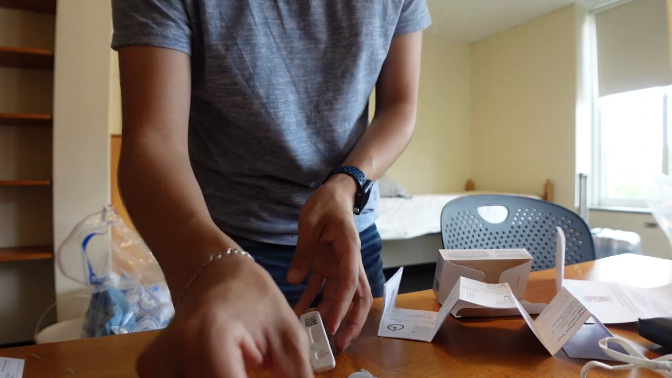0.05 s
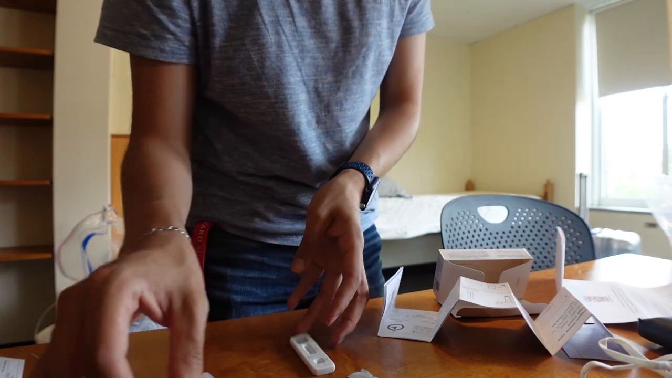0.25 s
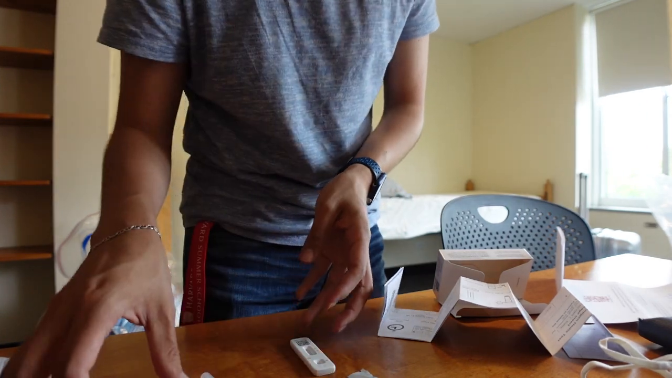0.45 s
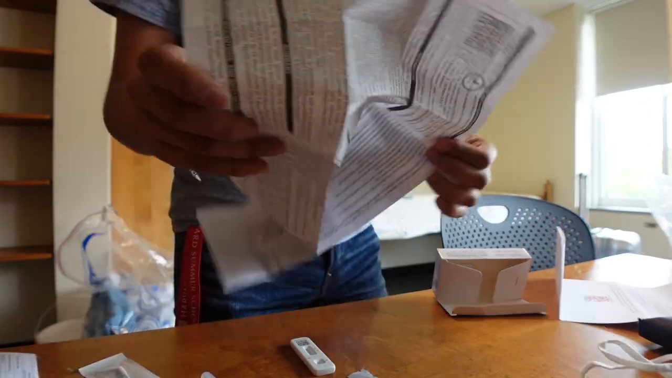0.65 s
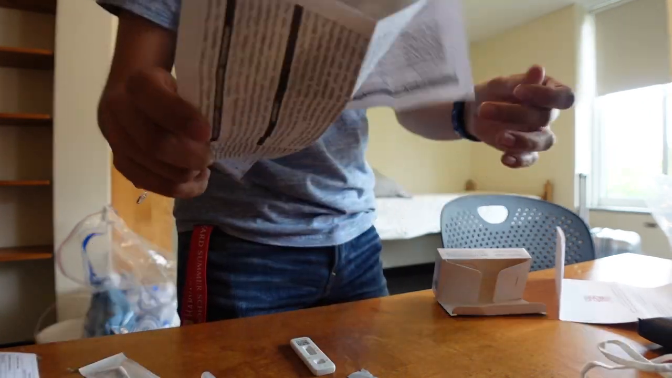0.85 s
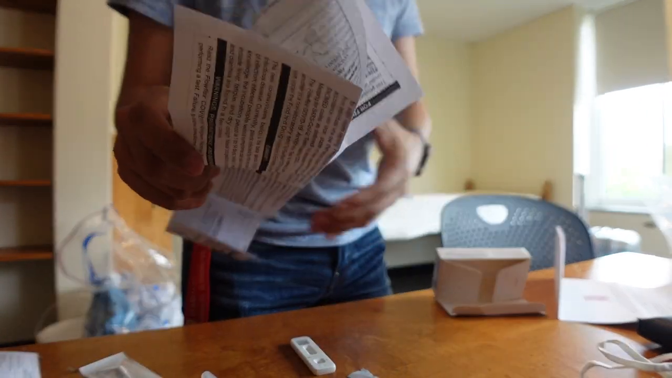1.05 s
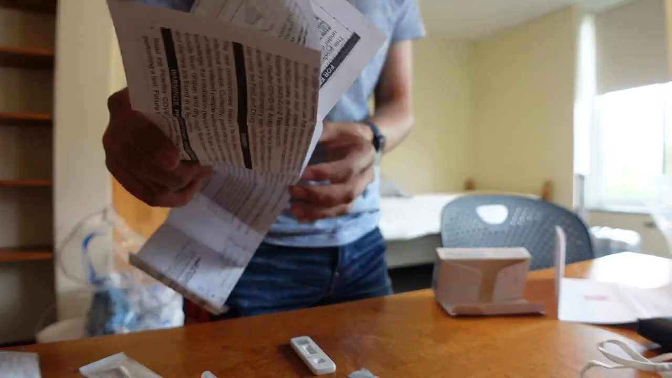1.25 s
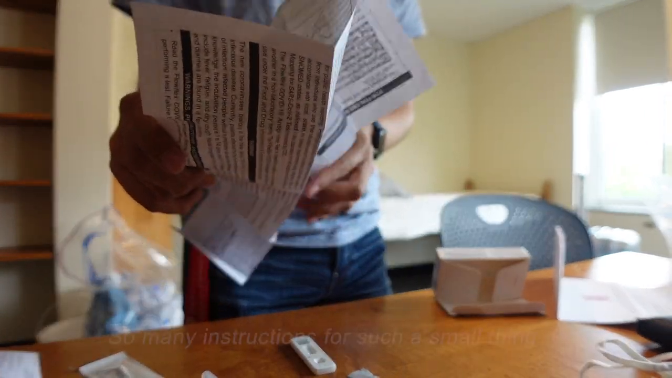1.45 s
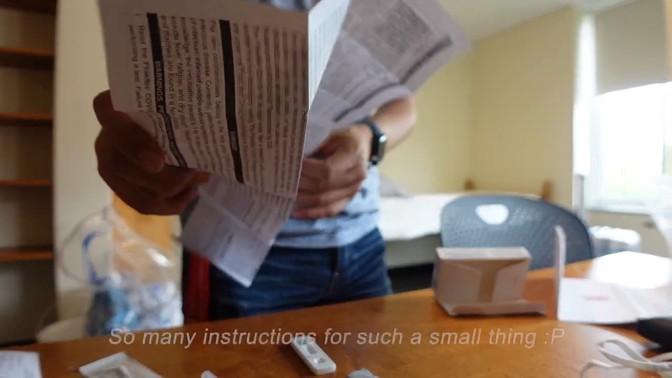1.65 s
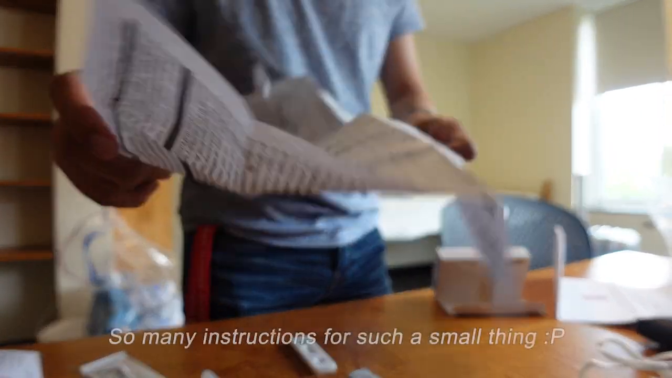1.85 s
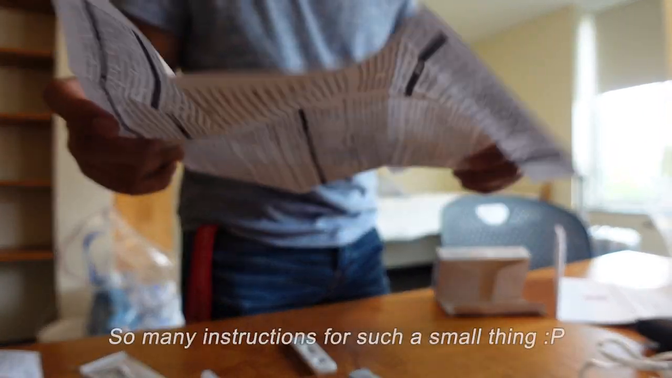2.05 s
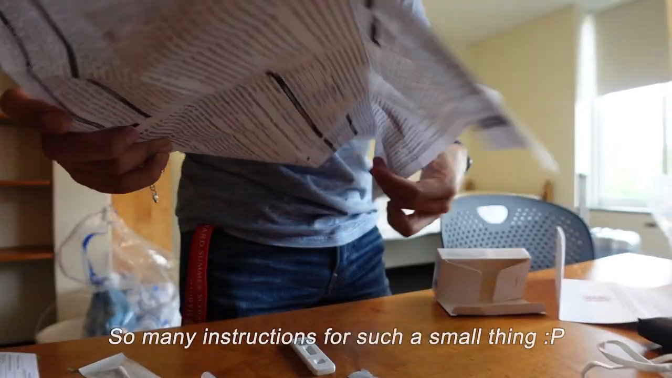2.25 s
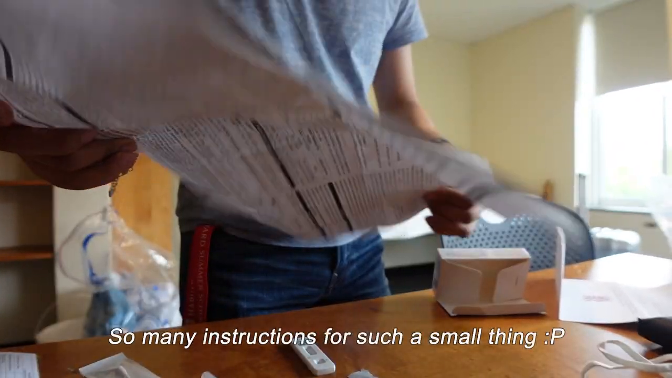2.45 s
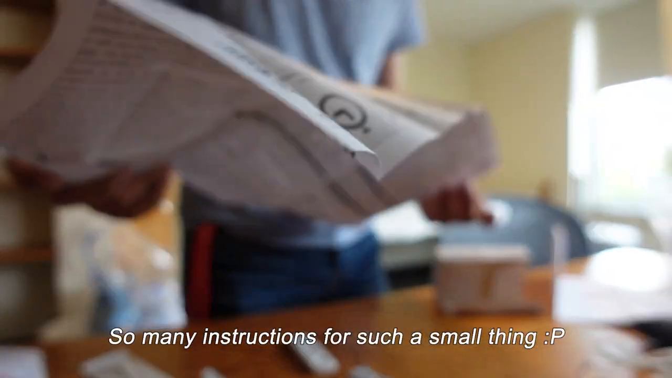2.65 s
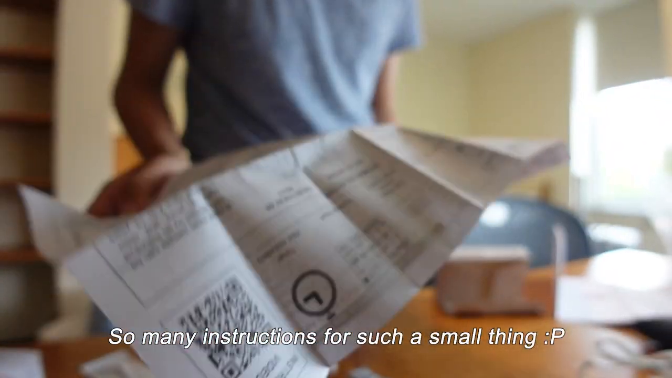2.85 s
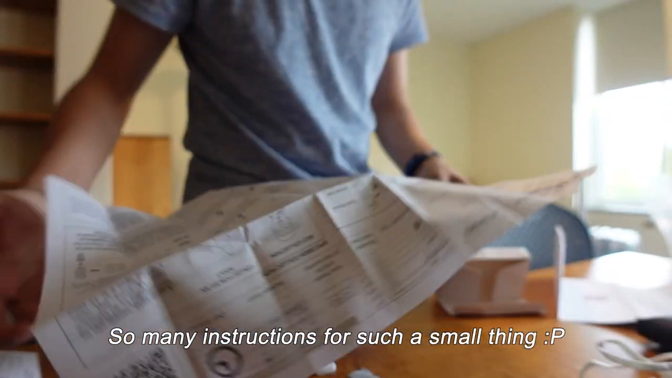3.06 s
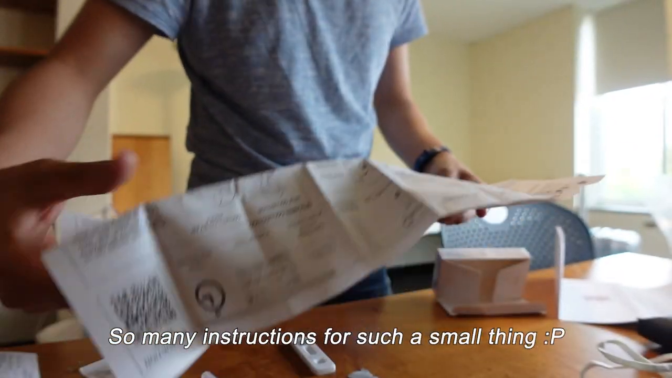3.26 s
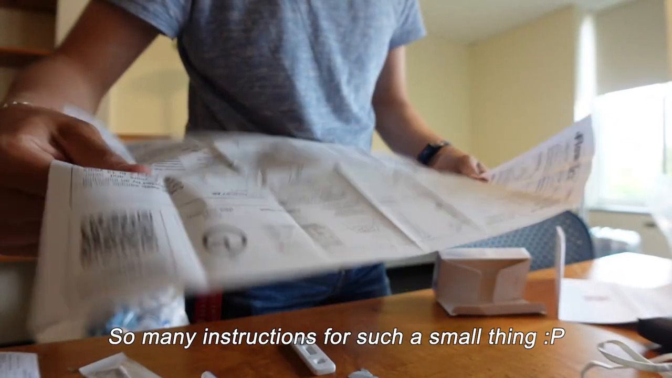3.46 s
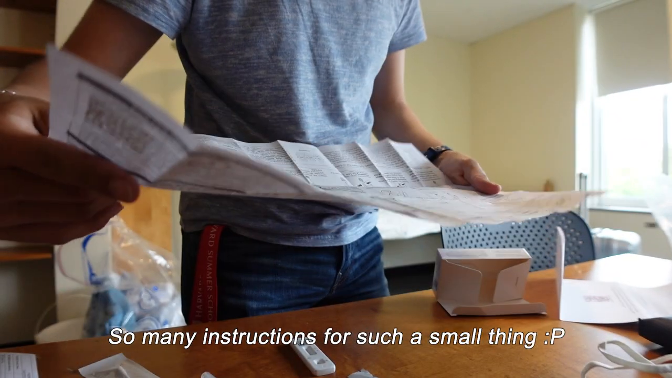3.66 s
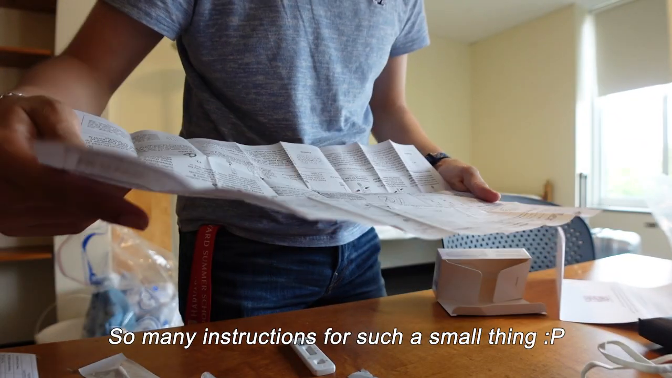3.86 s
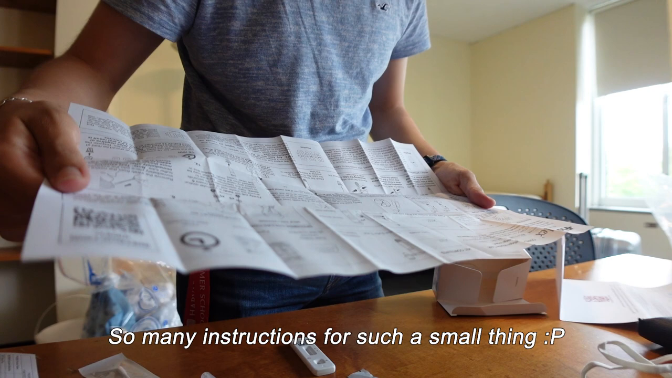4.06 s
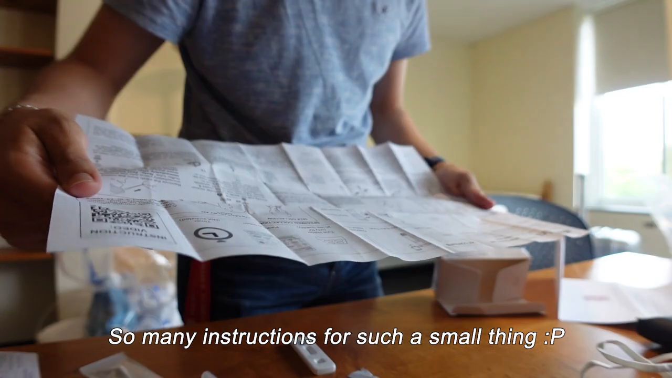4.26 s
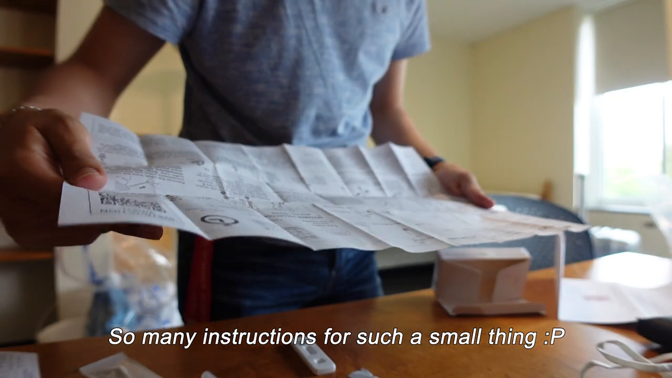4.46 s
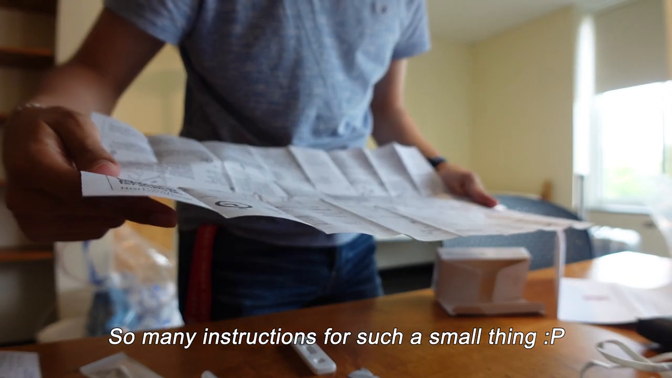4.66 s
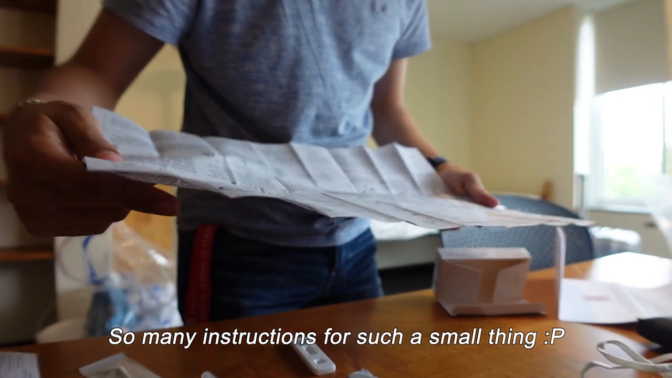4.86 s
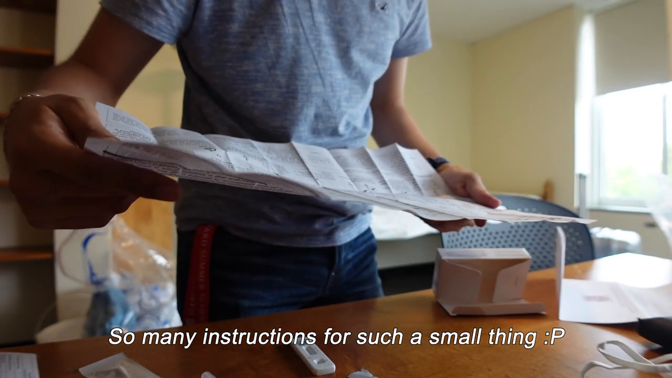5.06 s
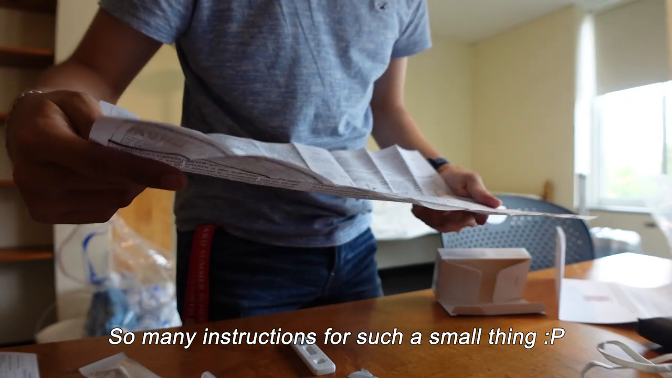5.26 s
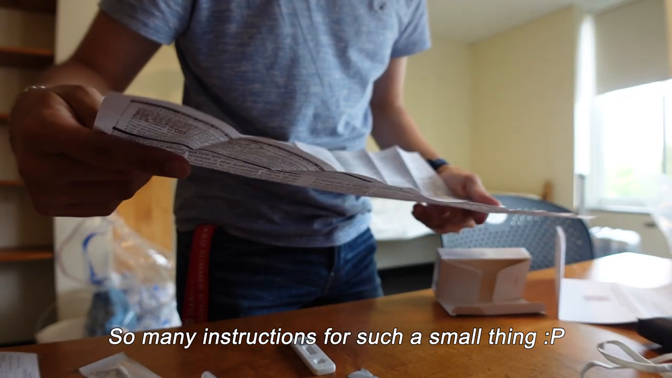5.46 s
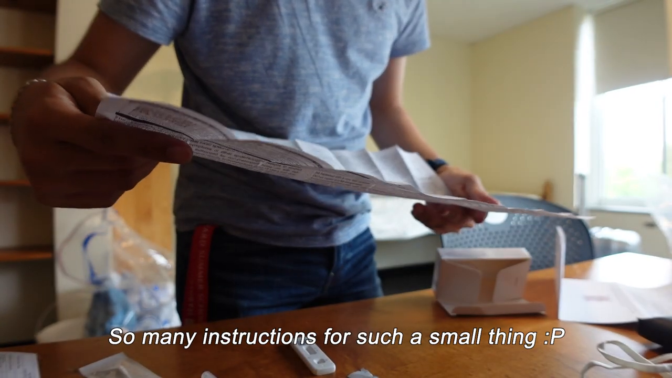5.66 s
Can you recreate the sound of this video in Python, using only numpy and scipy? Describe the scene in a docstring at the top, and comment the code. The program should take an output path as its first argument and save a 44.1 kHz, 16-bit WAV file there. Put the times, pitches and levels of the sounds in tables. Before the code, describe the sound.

A large creased paper sheet is unfolded and shaken open close by, with loud crisp crackles and rustles in a small quiet room.

```python
"""In a small, quiet room, a large folded paper leaflet is opened and shaken flat close to a camera.
Each pull of the hands swells, holds and dies away as a dense crackle of tiny random clicks (buckles).
Creases snap over in quick runs of clicks that ring their panel, lone buckles tick, panels swing with sagging
notes, fingers hiss and squeak on the sheet, and the paper rustles on as it settles.
Dense fading noise gives the room's echoes; coloured noise and two wavering tones give the low ventilation."""
import sys
import numpy as np
from scipy import signal
from scipy.fft import rfft, irfft
from scipy.io import wavfile
from scipy.ndimage import uniform_filter1d, minimum_filter1d

SR = 44100
rng = np.random.default_rng(int(sys.argv[2]) if len(sys.argv) > 2 else 0)


def materialize(psi):
    """Save the field psi as 16-bit PCM at rate SR to the path in sys.argv[1].

    A 1-D psi becomes a single channel; in a 2-D psi each row is a channel.
    """
    bounded = np.clip(np.atleast_2d(psi).T, -1, 1)
    quanta = np.round(bounded * 32767).astype(np.int16)
    wavfile.write(sys.argv[1], SR, quanta)


N = 252252
TIME = np.arange(N) / SR
# In all names below, t60 is the time in seconds that a sound takes to fade by 60 dB.


def amp(db):
    """Turn decibels into a plain multiplier."""
    return 10 ** (np.asarray(db) / 20)


def unit(x):
    """Scale to an average strength (rms) of 1."""
    return x / np.sqrt(np.mean(x ** 2) + 1e-20)


def at(points, hz):
    """Read a value between (pitch_hz, value) points, with pitch on a logarithmic scale."""
    point_hz, value = np.transpose(points)
    return np.interp(np.log(np.maximum(hz, 1)), np.log(point_hz), value)


def colour(x, points, size=2048):
    """Make some pitches stronger than others, following (pitch_hz, gain_db) points, with no sound ahead of x."""
    gain = amp(at(points, np.fft.rfftfreq(size, 1 / SR)))
    # folding the cepstrum forward gives a filter that only rings after its input
    cepstrum = irfft(np.log(gain))
    cepstrum[1:size // 2] *= 2
    cepstrum[size // 2 + 1:] = 0
    response = irfft(np.exp(rfft(cepstrum)))
    return signal.fftconvolve(x, response)[:len(x)]


def resonate(x, hz, q):
    """Ring at one pitch, with gain 1 there; a higher q rings longer and purer."""
    b, a = signal.iirpeak(min(hz, SR / 3), max(q, 1), fs=SR)
    return signal.lfilter(b, a, x)


def voiced(x, body_db, treble_db):
    """Level body, middle and treble separately, with the middle at rms 1 and the others set against it."""
    bands = []
    for edges_hz in [(95, 900), (900, 6000), (6000, 15000)]:
        band_filter = signal.butter(3, edges_hz, "band", fs=SR, output="sos")
        bands.append(unit(signal.sosfilt(band_filter, x)))
    body, middle, treble = bands
    return body * amp(body_db) + middle + treble * amp(treble_db)


def place(x, pan_db):
    """Spread one channel to two, the left louder than the right by pan_db."""
    return x * amp(np.array([[.5], [-.5]]) * pan_db)


def add(out, s, x):
    """Mix x in from time s."""
    i = max(int(s * SR), 0)
    out[..., i:i + x.shape[-1]] += x[..., :N - i]


def walk(rate):
    """Wander smoothly up and down by about 1, heading for a new random value `rate` times a second."""
    k = max(int(SR / rate), 1)
    steps = np.repeat(rng.standard_normal(N // k + 1), k)[:N]
    return unit(uniform_filter1d(steps, k))


def buckles(n, rate, spread_db):
    """Paper gives way in tiny clicks, `rate` a second on average, most faint and a few strong."""
    chance = rng.random(n)
    size = np.minimum(rng.exponential(size=n), 4)
    sign = rng.choice([-1, 1], n)
    return (chance < rate / SR) * amp(spread_db * size) * sign


# How unlike left and right are in sound from all around: pitch_hz, side_minus_mid_db
LEFT_RIGHT_WIDTH = [(100, -27), (250, -20), (500, -10), (1000, -9.5), (2000, -6.5), (4000, -5),
                    (10000, -6.5)]


def diffuse(points):
    """Noise from all around is alike left and right in the bass and less so in the treble."""
    mid = colour(rng.standard_normal(N), points)
    side = colour(rng.standard_normal(N), points)
    return unit(mid + np.array([[1], [-1]]) * colour(side, LEFT_RIGHT_WIDTH))


# Colour of the ventilation air: pitch_hz, relative_gain_db
VENT_COLOUR = [(15, -82), (25, -55.5), (70, -11), (108, -8.5), (185, -2.5), (301, -8), (335, -6.5),
               (476, -23), (516, -15), (796, -20.5), (1070, -21), (2280, -30.5), (2760, -31.5),
               (5000, -37.5), (16000, -56.5)]
# Fan tones: pitch_hz (average), level_db (rms, before its wavering)
FAN_TONES = [(188, -61), (237, -58.5)]


def ventilation(air_db=-49.5, waver_db=1, drift=0.0207, flutter_db=2):
    """Moving air makes low noise, and two fan tones waver in pitch (by a fraction, drift) and level."""
    air = diffuse(VENT_COLOUR) * amp(air_db + waver_db * walk(3.83))
    for hz, db in FAN_TONES:
        phase = 2 * np.pi * np.cumsum(hz * (1 + drift * walk(14))) / SR
        air = air + amp(db + flutter_db * walk(8.3)) * unit(np.sin(phase))
    return air


# Colour of the echoes at their start: pitch_hz, relative_gain_db
ECHO_COLOUR = [(50, -4), (100, 7), (300, 4), (1000, 3), (4000, -1), (8000, -1.5), (15000, 0.5)]
# How long the echoes last at each pitch: pitch_hz, t60_s
ECHO_FADE = [(150, 1), (1000, 0.66), (4000, 0.6), (8000, 0.62), (15000, 0.78)]


def echoes(gap=.0055, build=0.0073, early_db=3, early_t60=0.09):
    """Desk and walls send back dense echoes, strongest early on, that fade at a pace set by pitch."""
    noise = diffuse(ECHO_COLOUR)[:, :SR]
    f, t, cells = signal.stft(noise, SR, nperseg=128)
    fade = amp(-60 * t / at(ECHO_FADE, f)[:, None])
    tail = signal.istft(cells * fade, SR)[1][:, :SR]
    t = TIME[:SR]
    arrival = np.clip((t - gap) / build, 0, 1)  # gap and build in seconds
    early_boost = 1 + amp(early_db - 60 * t / early_t60)
    return unit(tail * arrival * early_boost) / np.sqrt(SR)


def room(x, wet_db=-6, move_rate=9, count=4):
    """Sound comes from four parts of the sheet in turn, nine moves a second, each with its own echoes."""
    out = 0
    for spot in range(count):
        share = np.maximum(1 - np.abs((TIME * move_rate + spot) % count - 1), 0)
        heard_here = x * np.sqrt(share)
        out = out + signal.fftconvolve(heard_here[None], echoes(), axes=1)[:, :N]
    return amp(wet_db) * out


# Fingers sliding on the sheet: start_s, level_db (rms before the rise and fade), rise_s, t60_s,
# then squeak_1_hz, squeak_2_hz, squeak_3_hz, squeak_4_hz
FINGER_SLIDES = [(.05, -49, 0.012, 0.24, 1280, 4200, 6200, 11000),
                 (.385, -45, 0.044, 0.28, 3600, 4400, 5750, 9000),
                 (4.472, -45, 0.03, 0.39, 1480, 3660, 4520, 9930),
                 (5.434, -42.5, 0.019, 0.46, 2270, 2430, 6300, 10700)]
# Colour of the friction hiss: pitch_hz, relative_gain_db
FRICTION_COLOUR = [(900, -32), (1500, 3.5), (2400, -1), (3100, 0), (4500, -1.5), (6500, -2.5),
                   (10000, -11.5), (15000, -19)]


def slides(squeak_db=11, step_db=1, q=22, edge=0.81):
    """Friction makes a fine hiss with a few faint squeaking notes, and little below the lowest of them."""
    out = np.zeros(N)
    t = TIME[:SR // 2]
    for s, db, rise, t60, *pitches in FINGER_SLIDES:
        hiss = colour(buckles(len(t), rate=12000, spread_db=4.5), FRICTION_COLOUR)
        low_cut = signal.butter(4, edge * pitches[0], "high", fs=SR, output="sos")
        hiss = signal.sosfilt(low_cut, hiss)
        squeaks = sum(amp(squeak_db - k * step_db) * resonate(hiss, hz, q) for k, hz in enumerate(pitches))
        swell = np.minimum(t / rise, 1)
        fade_db = -60 * np.maximum(t - 2 * rise, 0) / t60
        add(out, s, unit(hiss + squeaks) * swell * amp(db + fade_db))
    return out


# Panels swinging freely, the widest only pushing a puff of air:
# start_s, peak_db, pitch_hz (at the loudest moment), rise_s
PANEL_SWINGS = [(0.449, -32.5, 254, 0.0066), (0.48, -33, 243, 0.01), (0.565, -29, 350, .012),
                (.541, -39, 62, 0.0045), (0.606, -23, 515, 0.005), (.893, -35, 274, 0.018),
                (1.141, -38, 804, 0.011), (1.36, -14.5, 2790, 0.0034), (3.385, -31.5, 689, 0.01),
                (3.474, -50.5, 56.5, 0.009),           (3.71, -11.5, 1600, 0.00062),
                (4.867, -46.5, 607, 0.0068), (4.938, -35.5, 596, 0.008), (5.201, -43.5, 546, 0.0031),
                (5.407, -39.5, 450, 0.0015)]


def flexes(sag=0.032):
    """A swinging panel sounds a short note that swells and fades, its pitch sagging as the tension goes."""
    out, t = np.zeros(N), TIME[:SR // 8]
    for s, db, hz, rise in PANEL_SWINGS:
        age = t / rise
        pitch = hz * (1 + sag * (1 - np.minimum(age, 4)))
        phase = 2 * np.pi * np.cumsum(pitch) / SR
        swing = (age * np.exp(1 - age)) ** 2  # loudest when age is 1
        add(out, s, amp(db) * swing * np.sin(phase))
    return out


# Lone buckles: start_s, peak_db
LONE_BUCKLES = [(0.6499, -11), (.747, -10), (1.2549, -18.5), (1.264, -14), (1.448, -12), (1.575, -18.5),
                (1.583, -16), (1.733, -14), (1.884, -5.5), (2.150, -17.5), (2.438, -25), (2.49, -13),
                (3.297, -30.5), (3.746, -7.5), (4.083, -38.5)]
# Their thin, bright colour: pitch_hz, relative_gain_db
LONE_BUCKLE_COLOUR = [(300, -29.5), (2000, 1.5), (5500, 2.5), (9000, -3), (15000, -22.5)]


def ticks(t60=0.0034, size=512):
    """A single buckle pops as a burst of noise that is gone within a few milliseconds."""
    out = np.zeros(N)
    for s, db in LONE_BUCKLES:
        burst = rng.standard_normal(size) * amp(-60 * TIME[:size] / t60)
        x = colour(burst, LONE_BUCKLE_COLOUR)
        add(out, s, amp(db) * x / np.abs(x).max())
    return out


# Colour of a single crease: pitch_hz, relative_gain_db
CREASE_COLOUR = [(59, -56.5), (100, -18), (1650, -3.5), (2170, -2), (2800, -3), (3320, -3), (4770, -3.5),
                 (8280, -13.5), (13500, -34), (16000, -49)]
# Creases snapping over: start_s, relative_level_db, panel_pitch_hz, relative_body_db, relative_treble_db
# (the three levels are shifted by gain_db, body_db and treble_db below)
CREASE_SNAPS = [(0.0338, -33.5, 3670, -17, -1.5), (0.0664, -29, 4150, -21.5, 3),
                (0.1148, -37, 4340, -14.5, 5), (0.3442, -14, 3950, -6, -1.5), (0.5445, -5, 3160, -4, -9.5),
                (0.5705, -10, 2220, -7, -23.5), (0.603, -10.5, 1900, -7, -25.5),
                (0.6541, -5.5, 2000, -22, -7.5), (0.6727, -10, 1890, -25, -10), (0.6881, -7, 2730, -10, -6),
                (0.6992, -7, 2130, -21, -3), (0.8233, -6, 1840, -7.5, -23),
                (0.8731, -6.5, 2870, -22.5, -12.5), (0.9008, -5, 1540, -16, -24),
                (0.9936, -17, 2140, -21.5, -25), (1.049, -6.5, 3300, -13.5, -5.5),
                (1.1447, -8.5, 2870, -7.5, -12), (1.2874, -6, 1700, -10.5, -7.5),
                (1.3602, -9, 2570, -10, -14), (1.4401, -6.5, 4640, -14, -9.5),
                (1.5281, -18, 1850, -13, -13.5), (1.609, -6, 3900, -26, -3.5),
                (1.65, -4, 1820, -27.5, -18.5), (1.6792, -9, 2240, -28.5, -20.5),
                (1.7818, -6.5, 1850, -25.5, -17.5), (1.8175, -1.5, 5000, -28, -16),
                (1.8743, -8, 2400, -32.5, -17.5), (1.9574, -8.5, 3700, -22, 0),
                (1.9781, -8, 3700, -15.5, -11), (2.0407, -9, 4380, -18, -19), (2.159, -11, 3200, -10, -5.5),
                (2.2052, -9.5, 2370, -21, -10), (2.2447, -9.5, 2280, -13, -5), (2.311, -2, 1890, -10, -7),
                (2.398, -9.5, 4100, -8.5, -12.5), (2.4966, -4.5, 2400, -12.5, -18.5),
                (2.694, -6.5, 4170, -29, -4.5), (2.8766, -9.5, 4530, -23.5, -8.5),
                (2.898, -13, 5700, -30.5, -11), (2.9767, -7, 1470, -28, -2),
                (3.0502, -10, 4180, -8.5, -5.5), (3.0797, -6, 2630, -9, -7.5), (3.249, -23, 1620, 0, -22),
                (3.3581, -17, 2660, -2, -10), (3.4328, -21.5, 1570, -24, 1), (3.475, -9.5, 1360, -29, -23),
                (3.4857, -5.5, 1150, -25, -10), (3.558, -1.5, 3910, -23, -11.5),
                (3.709, -22, 1470, -31, -16), (3.7441, -11.5, 4960, -39, -9),
                (5.645, -20.5, 2520, -12, -14)]


def snaps(gain_db=-9, body_db=-3, treble_db=0, q=11, rise=0.0007, flutter_db=-22, flutter_t60=0.33, size=7000):
    """A crease gives way in a quick run of buckles that rings its panel; the sheet flutters on briefly."""
    run_t60, ring_db, pan_db = .023, 3, -0.7  # the same for every crease
    out, t = np.zeros(N), np.arange(size) / SR
    fade = amp(-60 * t / run_t60) + amp(flutter_db - 60 * t / flutter_t60)
    run = (1 - np.exp(-t / rise)) * fade
    peak_scale = np.sqrt(np.mean(run ** 2)) / run.max()  # sets the level at the run's strongest moment
    for s, db, hz, body, treble in CREASE_SNAPS:
        x = colour(buckles(size, rate=16000, spread_db=1.0) * run, CREASE_COLOUR)
        x = x + amp(ring_db) * resonate(x, hz, q)
        x = voiced(x, body + body_db, treble + treble_db) * peak_scale
        add(out, s - .001, x * amp(db + gain_db))
    return place(out, pan_db)


# Colour of the whole sheet: pitch_hz, relative_gain_db
PAPER_COLOUR = [(47, -64.5), (80, -33.5), (133, -12), (353, -5), (413, -4), (527, -1), (575, -6), (629, -1),
                (687, -4.5), (1560, -1), (3790, -2.5), (7530, -8), (10700, -18), (16000, -34.5)]


def crackle(rate, spread_db, patchy_db, run_t60=0.02, q=5, change_rate=130):
    """Small creases give way at random in short runs of buckles, on patches whose pitch keeps changing."""
    creases = buckles(N, rate, spread_db)
    keep = amp(-120 / (run_t60 * SR))  # 120 because power, not level, is faded here
    runs = np.sqrt(signal.lfilter([1], [1, -keep], creases ** 2) / rate)
    clicks = runs * buckles(N, rate=11000, spread_db=2.5)
    patches = 0
    for hz in np.geomspace(150, 14000, num=22):
        strength = amp(patchy_db * np.clip(walk(change_rate), -2, 2))
        patches = patches + resonate(clicks, hz, q) * strength
    return unit(colour(patches, PAPER_COLOUR))


def rustle(effort, settle_db=-18.5, settle_t60=1.1):
    """The bent sheet goes on settling in sparse crackles that fade after each pull."""
    keep = amp(-120 / (settle_t60 * SR))
    strain = np.sqrt(signal.lfilter([1 - keep], [1, -keep], effort ** 2))
    sparse = crackle(rate=700, spread_db=3.5, patchy_db=4.5)
    return sparse * strain * amp(settle_db)


def pull(start, rise, hold, db, swell_from_db=10, t60=0.32):
    """One pull swells from 10 dB below its full strength, holds, and dies away as the hands ease off."""
    age = TIME - start
    swell_db = swell_from_db * np.clip(age / max(rise, .001) - 1, -1, 0)
    release_db = -60 * np.maximum(age - rise - hold, 0) / t60
    return (age >= 0) * amp(db + swell_db + release_db)


# Pulls of the hands that bend the panels: start_s, rise_s, hold_s, crackle_db (middle pitches, at full pull),
# body_db and treble_db (both relative to the middle)
HAND_PULLS = [(0, .002, 0.13, -53.5, -11.5, -0.5), (0.353, .003, 0.043, -40, -12, -3),
              (0.54, .005, 0.048, -30, -4.5, -11), (0.651, 0.074, .05, -20.5, -10.5, -7),
              (0.863, 0.018, 0.0095, -27, -9.5, -21), (1.265, .014, .018, -31.5, -7.5, -13),
              (1.421, .014, .002, -33.5, -10, -6), (1.618, .01, .005, -32, -13, -6),
              (1.636, 0.014, 0.0083, -23, -11, -5.5), (1.706, .012, 0.0066, -24.5, -8, -14.5),
              (1.771, 0.019, 0.044, -19.5, -14, -4.5), (1.848, 0.022, 0.031, -21, -10, -13),
              (1.92, 0.059, .012, -20, -12, -9.5), (2.143, .02, .012, -33.5, -6.5, -12),
              (2.2, .012, .07, -27, -7.5, -8), (2.489, 0.034, 0.03, -17.5, -15.5, -9.5),
              (2.67, .008, 0.014, -30, -7, -10.5), (2.825, .006, 0.015, -33.5, -7.5, -12.5),
              (2.89, 0.01, 0.11, -29, -12, -12), (3.028, 0.041, 0.021, -27.5, -8, -14),
              (3.28, 0.005, .015, -36, -2, -10.5), (3.371, 0.006, 0.034, -32.5, -8, -11),
              (3.465, 0.0098, 0.026, -22.5, -9, -5), (3.502, 0.031, 0.042, -18.5, -18, -8),
              (3.686, 0.011, .018, -33, -11.5, -14), (5.041, .21, .02, -66, 0, -16)]


def handling():
    """The pulls add up in power, and the strongest at each moment decide the body and treble."""
    power = np.array([pull(*row[:4]) ** 2 for row in HAND_PULLS]) + 1e-18
    total = power.sum(axis=0)
    body, treble = np.array(HAND_PULLS)[:, 4:].T @ power / total
    return np.sqrt(total), body, treble


def bends(effort, body, treble, wander_db=2, pan_db=-0.5, full_rate=6300):
    """Hands bend the panels; the harder they bend, the louder and denser the crackle, wandering sideways."""
    sheet = crackle(rate=full_rate * np.sqrt(effort + .001), spread_db=2.5, patchy_db=4.5)
    return place(voiced(sheet, body, treble) * effort, wander_db * walk(65) + pan_db)


# Near sound scattered by the camera body: pitch_hz, side_minus_mid_db (before its wavering)
BODY_SCATTER = [(200, -41), (1000, -32.5), (3000, -9.5), (7000, -5), (14000, 1)]


def ports(x, lag=.0004):
    """The camera body scatters short waves, so its two microphone ports hear the treble differently."""
    mid = x.mean(axis=0)
    late = np.interp(TIME - lag, TIME, mid)  # lag in seconds
    return x + np.array([[1], [-1]]) * colour(late, BODY_SCATTER) * walk(55)


def scene(flex_echo_db=-8):
    """The paper near the microphone, its echoes and the room's own noise."""
    effort, body, treble = handling()
    paper = snaps() + ticks() + bends(effort, body, treble) + rustle(effort) + slides()
    flex = flexes()
    # the two faces of a swinging panel cancel far away, so little of it reaches the walls
    to_walls = paper.mean(axis=0) + amp(flex_echo_db) * flex
    return ports(paper) + flex + room(to_walls) + ventilation()


def limit(x, ceiling_db=-5.0, size=130):
    """Duck smoothly for a few milliseconds around any peak over the ceiling."""
    gain = np.minimum(amp(ceiling_db) / (np.abs(x).max(axis=0) + 1e-9), 1)
    return x * uniform_filter1d(minimum_filter1d(gain, size), size)


def record(dry, top_hz=16000):
    """The camera holds down the loudest peaks and cuts the top."""
    top_cut = signal.ellip(10, .2, 80, top_hz, fs=SR, output="sos")
    return signal.sosfilt(top_cut, limit(dry))


dry = scene()
out = record(dry)
materialize(out)
```